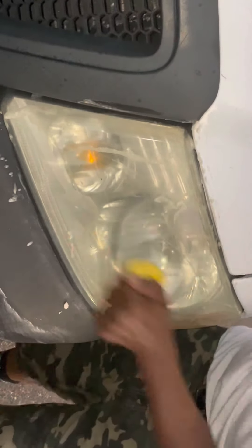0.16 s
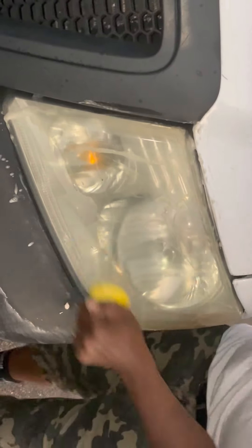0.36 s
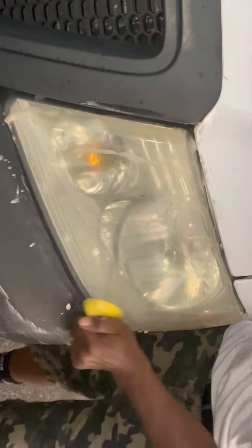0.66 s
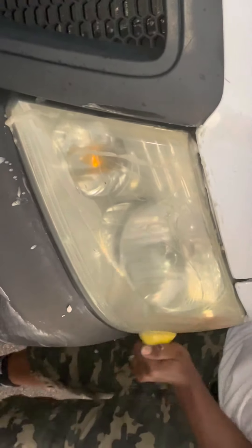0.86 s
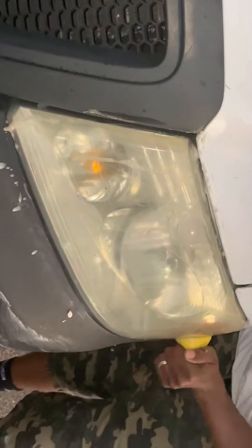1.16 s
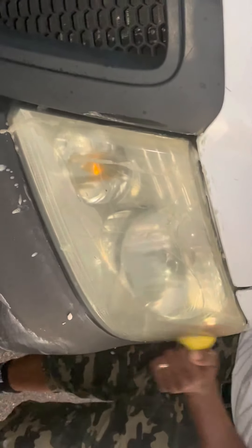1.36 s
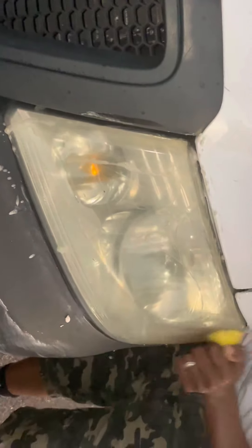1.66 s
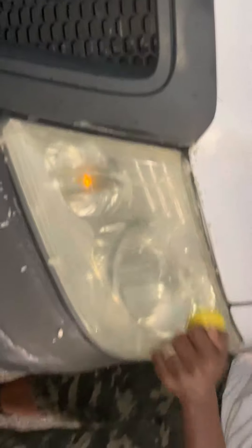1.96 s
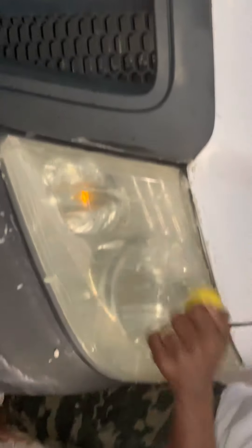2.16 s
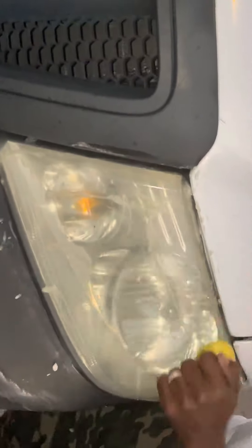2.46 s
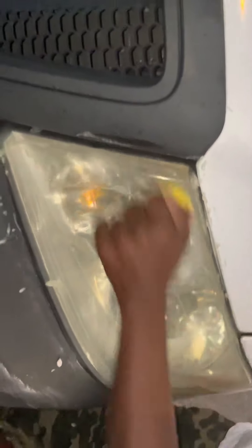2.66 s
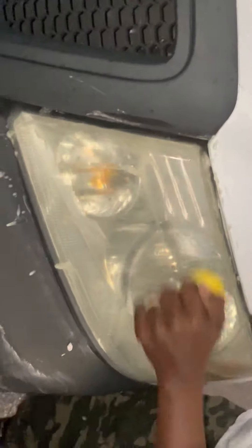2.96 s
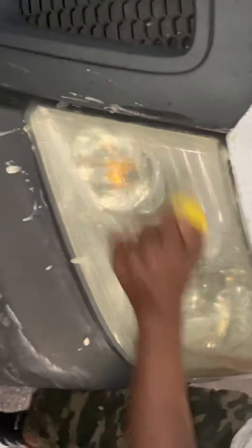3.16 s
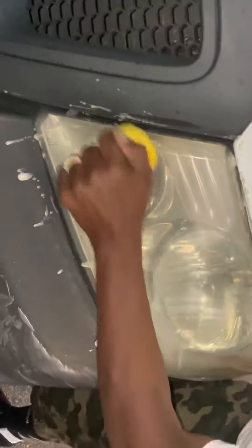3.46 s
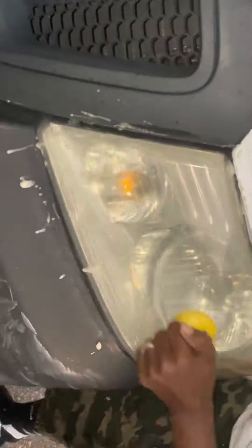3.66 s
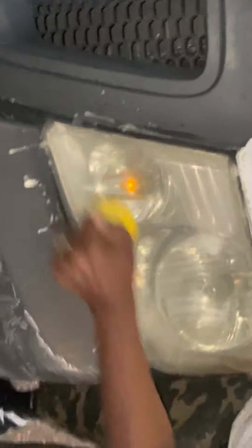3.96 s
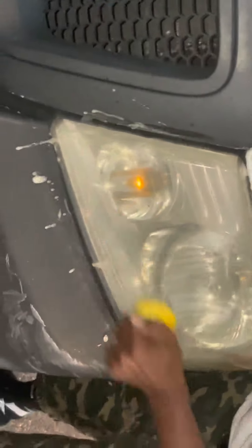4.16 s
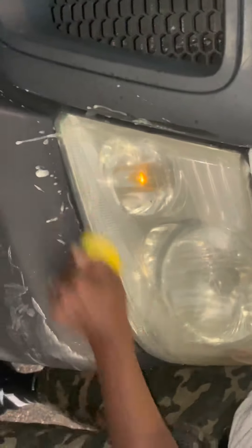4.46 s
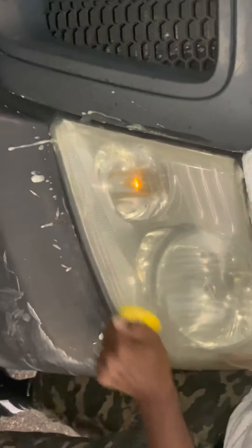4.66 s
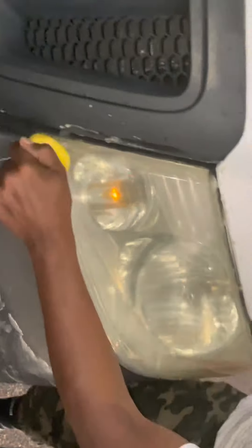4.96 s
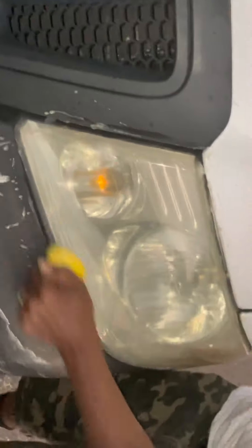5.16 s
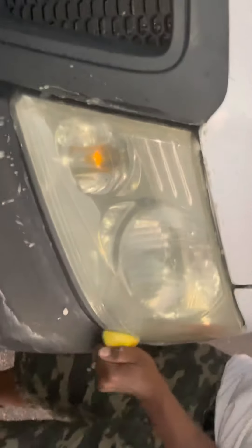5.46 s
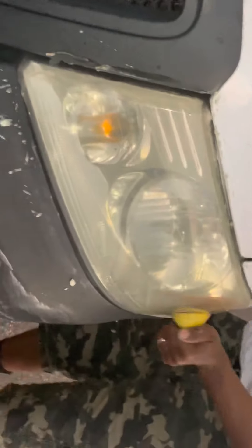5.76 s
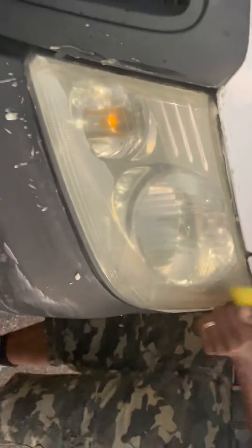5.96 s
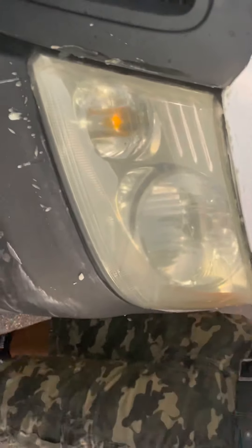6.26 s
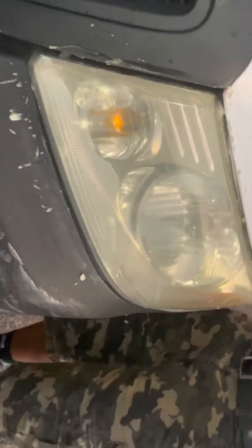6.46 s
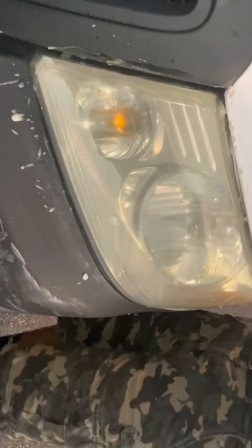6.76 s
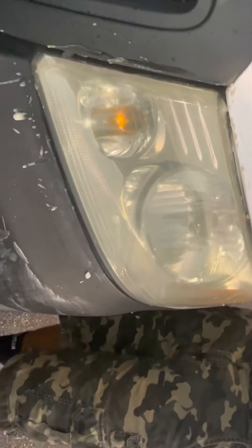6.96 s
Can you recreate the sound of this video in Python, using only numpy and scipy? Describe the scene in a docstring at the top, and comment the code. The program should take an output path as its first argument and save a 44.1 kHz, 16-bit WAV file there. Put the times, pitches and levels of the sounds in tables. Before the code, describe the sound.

Close to a phone outdoors, a cut lemon is scrubbed over a plastic headlight lens: uneven wet hisses and dry rasps dipping at each turn, with low judders, tiny clicks and hollow clucks. Distant traffic rumbles softly beneath. Past the middle, a nearby vehicle pulls away, its engine note climbing quickly and settling into a strong low hum while the scrubbing thins out.

```python
"""Outdoors by a street, a lemon half is scrubbed to and fro over a plastic headlight lens, close to a phone.
The wet pulp hisses (random impulses shaped by filters) and dips in level as the hand turns.
The rind judders, clucks and clicks on the lens: short slips that set off dying rings.
Over a low street rumble (filtered noise) a vehicle nearby picks up speed and settles into a steady hum:
sine waves that follow the engine's firing rate, with a rough drone and tyre noise."""
import sys
import numpy as np
from scipy import signal
from scipy.fft import rfft, irfft, next_fast_len
from scipy.io import wavfile
from scipy.ndimage import uniform_filter1d, map_coordinates

SR = 44100
rng = np.random.default_rng(int(sys.argv[2]) if len(sys.argv) > 2 else 0)


def dump_mix(stems):
    """Bounce the given channels to the path in sys.argv[1] as a 16-bit WAV at rate SR."""
    frames = np.atleast_2d(stems).T  # one column per channel
    limited = np.clip(frames, -1, 1)  # hard clip at full scale
    pcm = np.round(limited * 32767).astype(np.int16)
    wavfile.write(sys.argv[1], SR, pcm)


N = 313551


def amp(db):
    """Turns decibels into a gain."""
    return 10 ** (np.asarray(db) / 20)


def unit(x):
    """Scales a sound to rms 1."""
    return x / np.sqrt(np.mean(x ** 2) + 1e-20)


def along(points, hz):
    """Reads a curve of (Hz, value) points, with straight lines on a log frequency axis."""
    point_hz, value = np.transpose(points)
    return np.interp(np.log(hz + 1), np.log(point_hz + 1), value)


def curves(rows):
    """Gives one value per sample for each column after the time."""
    time_s, *columns = np.transpose(rows)
    return [np.interp(np.arange(N) / SR, time_s, column) for column in columns]


def wobble(rate):
    """A smooth random curve with this many knots a second."""
    knots = rng.standard_normal(int(N * rate / SR) + 4)
    return map_coordinates(knots, [np.arange(N) * rate / SR])


def bell(s, half):
    """A smooth hump of height 1 around time s; half sets its width in seconds."""
    return np.exp(-np.minimum(((np.arange(N) / SR - s) / half) ** 2, 20))


def filtered(x, response):
    """Multiplies the spectrum of x by a response, which may be complex."""
    m = next_fast_len(N + SR // 2)
    return irfft(rfft(x, m) * response(np.fft.rfftfreq(m, 1 / SR)), m)[..., :N]


def coloured(x, spectrum):
    """Filters x by a curve of (Hz, dB), then scales it to rms 1."""
    return unit(filtered(x, lambda hz: amp(along(spectrum, hz))))


def add(track, s, sound):
    """Mixes a sound into the track at time s."""
    part = track[max(0, round(s * SR)):][:len(sound)]
    part += sound[:len(part)]


def diffuse(spectrum):
    """Stereo noise from all round: shared and opposite parts set how alike left and right are."""
    # left-right likeness of the street: pitch_hz, likeness (0-1)
    likeness = [(100, 1), (250, 0.98), (450, 0.83), (700, 0.28), (1100, 0.55), (2200, 1)]
    a, b = (coloured(rng.standard_normal(N), spectrum) for _ in range(2))

    def angle(hz):
        return np.arccos(np.clip(along(likeness, hz), -1, 1)) / 2

    mid = filtered(a, lambda hz: np.cos(angle(hz)))
    side = filtered(b, lambda hz: np.sin(angle(hz)))
    return np.array([mid + side, mid - side])


def street():
    """Distant traffic: a low rumble under a faint wash, both wavering filtered noise."""
    # colour of the rumble: pitch_hz, relative level_db (per Hz)
    rumble_colour = [(13, -63.5), (22, -30.5), (40, -10.5), (65, 1), (164, -8), (241, -15.5), (290, -15),
                     (383, -17), (412, -15), (460, -21), (505, -17), (553, -21), (678, -21), (1800, -38),
                     (2340, -52.5), (3960, -120)]
    # colour of the wash: pitch_hz, relative level_db (per Hz)
    wash_colour = [(200, -6), (500, 11.5), (1000, 7.5), (1600, -10.5), (2300, -9), (3200, -14),
                   (4300, -27.5), (8000, -40), (16000, -49)]
    rumble = amp(-44 + 1.2 * wobble(7)) * diffuse(rumble_colour)
    wash = amp(-60.5 + 0.44 * wobble(1.4)) * diffuse(wash_colour)
    return rumble + wash


def idle():
    """The engine ticking over: a faint, unsteady throb that gives way to the rising note."""
    # the throb's tones: pitch_hz, level_db (peak, about which it wavers)
    throb_tones = [(56, -60.5), (101, -51.5)]
    t = np.arange(N) / SR
    throb = np.zeros(N)
    for hz, db in throb_tones:
        throb += amp(db + 3.1 * wobble(13)) * np.sin(2 * np.pi * hz * t + 1.6 * wobble(12))
    return throb * np.clip((4.3 - t) / 0.62, 0, 1)  # faded out by 4.3 s


def muffler(hz):
    """The exhaust weakens a line more and more steeply above an edge frequency."""
    edge_hz, slope_db_per_octave = 181.6, 147.5
    return amp(-slope_db_per_octave * np.log2(np.maximum(hz / edge_hz, 1)))


def engine():
    """The exhaust's firing note climbs and levels off; uneven firing adds lines and a rough drone."""
    # the firing note: time_s, firing_hz, level_db (rms)
    firing_path = [(4.2, 48.6, -41), (4.22, 50.3, -35), (4.37, 56.7, -41), (4.42, 59.8, -32.5),
                   (4.56, 70.59, -31), (4.68, 79.7, -28), (4.77, 86.5, -39), (4.8, 88, -34.5),
                   (4.85, 90.3, -28), (5.02, 91.96, -30.5), (5.3, 102.3, -25.5), (5.8, 108.9, -26.5),
                   (6.15, 111.1, -32.5), (6.45, 112.5, -26), (6.61, 112.9, -30), (7.11, 114.6, -26.5)]
    # weaker lines, before the muffler: multiple of the firing rate,
    # pulling_away_db, settled_db (against the smoothed firing level)
    weaker_lines = [(0.622, -23.5, -8.5), (1.251, -23.5, -25), (1.5, -24.5, -21.5), (1.625, -18, -17.5),
                    (2, -9.5, -17)]
    # colour of the exhaust roughness: pitch_hz, relative level_db (per Hz)
    drone_colour = [(22, -18), (50, -6.5), (70, 10.5), (88, 3.5), (130, 0.5), (175, 0), (215, -17.5),
                    (300, -30), (700, -54), (4000, -89.5)]
    t = np.arange(N) / SR
    hz, db = curves(firing_path)
    phase = 2 * np.pi * np.cumsum(hz * (1 + 0.0068 * wobble(18))) / SR
    running = np.clip((t - 4.18) / 0.11, 0, 1)
    settled = np.clip((t - 4.7) / 1.6, 0, 1)
    load = amp(uniform_filter1d(db, SR // 3))  # firing level smoothed over a third of a second
    firing = amp(db + 0.13 * wobble(28)) * np.sin(phase)
    lines = np.zeros(N)
    for multiple, early_db, late_db in weaker_lines:
        line_db = early_db + (late_db - early_db) * settled + 2.5 * wobble(14)
        line_phase = multiple * phase + 0.2 * wobble(6.6) + rng.uniform(0, 2 * np.pi)
        lines += muffler(multiple * hz) * amp(line_db) * np.sin(line_phase)
    drone = amp(-12.0) * coloured(rng.standard_normal(N), drone_colour)
    return running * (np.sqrt(2) * (firing + load * lines) + load * drone)


def tyres():
    """Tyre noise on the road: filtered noise that rises as the vehicle pulls away, then sinks."""
    # colour of the tyre noise: pitch_hz, relative level_db (per Hz)
    tyre_colour = [(150, -20), (245, 13), (330, 7), (500, 9), (650, -7.5), (1000, -16), (2000, -36.5),
                   (4000, -61.5)]
    # loudness of the tyre noise: time_s, level_db (rms, about which it wavers)
    rolling_level = [(4.2, -69.5), (4.9, -53.5), (5.4, -51.5), (6.4, -54), (7.1, -68)]
    level_db, = curves(rolling_level)
    return amp(level_db + 2.8 * wobble(10)) * coloured(rng.standard_normal(N), tyre_colour)


def bumps():
    """The car body gives under the hand with a dull bump: a soft, low swing that dies away."""
    # the bumps: start_s, level_db (peak), pitch_hz
    bump_list = [(3.473, -33.5, 54.7), (6.469, -32, 47.93)]
    out, t = np.zeros(N), np.arange(SR // 4) / SR
    for s, db, hz in bump_list:
        swing = np.sin(2 * np.pi * hz * t) * (1 - np.exp(-t / 0.007)) * amp(-60 * t / 0.2)
        add(out, s, amp(db) * swing / np.abs(swing).max())
    return out


def clicks():
    """Juice and rind snap against the lens: a few cycles of ring inside a broad crack."""
    # small wet clicks: start_s, level_db (of the ring, before a shared 1.5 dB boost), pitch_hz
    click_list = [(1.16, -45.5, 5330), (1.562, -42.5, 5700), (1.673, -51.5, 3950), (1.721, -44.5, 6100),
                  (2.818, -44.5, 4500), (3.104, -51.5, 5500), (3.425, -47, 2600), (3.429, -45, 2780),
                  (3.436, -44, 2010), (3.498, -46, 4060), (3.537, -42.5, 1100), (3.557, -51, 3120),
                  (3.5706, -37, 1568), (3.822, -50, 3500), (4.148, -44, 1307)]
    out, t = np.zeros(N), np.arange(SR // 40) / SR
    for s, db, hz in click_list:
        ring = np.sin(2 * np.pi * hz * t) * np.exp(-hz * t / 2.04)
        crack = 0.41 * rng.standard_normal(len(t)) * np.exp(-t / 0.0026)
        add(out, s, amp(db + 1.5) * (ring + crack))
    return out


def stick_slip(events, modes, attack, jitter, fade_db):
    """Each catch is a short, uneven train of slips that ring the plastic's damped modes."""
    out, t = np.zeros(N), np.arange(SR // 10) / SR
    for s, first_db, later_db, rate, length, pitch in events:
        for k in range(1 + int(length * rate)):
            ring = np.zeros(len(t))
            for hz, width, db in modes:
                strength = amp(db + rng.normal(0, 2.1))
                mode_hz = hz * pitch * rng.normal(1, 0.019)
                tone = np.sin(2 * np.pi * mode_hz * t + rng.uniform(0, 2 * np.pi))
                ring += strength * np.exp(-np.pi * width * t) * tone  # a wider mode dies faster
            ring *= 1 - np.exp(-(t / attack) ** 2)  # the soft rind lets go gradually
            late = (k + jitter * rng.normal() * (k > 0)) / rate  # seconds after the first slip
            slip_db = later_db - fade_db * late / length if k else first_db
            add(out, s + late, amp(slip_db) * ring / np.abs(ring).max())
    return out


def bodywork(x, t60, wet_db):
    """Panels and ground scatter a faint tail, different at each microphone."""
    t = np.arange(SR // 3) / SR
    envelope = amp(-60 * t / t60) * (1 - np.exp(-t / .004))
    tail = rng.standard_normal((2, len(t))) * envelope
    wet = signal.fftconvolve(x[None], tail / np.linalg.norm(tail[0]), axes=1)[:, :N]
    return x + amp(wet_db) * wet


def judders():
    """The rind sticks and slips, shaking the headlight housing, whose modes ring."""
    # the judders: start_s, first_slip_db (peak), later_slips_db (peak, before a slight rise along
    # the train), slips per second, length_s, pitch factor
    judder_list = [(.685, -38.5, -41.5, 145, 0.014, 1.45), (.815, -20.5, -25.5, 138, .044, 1.015),
                   (1.122, -24.5, -30.5, 136, 0.039, 1.04), (3.5385, -33, -53, 100, 0.015, 1.09),
                   (3.758, -38, -55, 95, .012, 1.13), (4.461, -28, -34, 101.6, .012, 1.215),
                   (6.07, -29, -26, 65, .02, 0.793), (6.465, -38, -37.5, 99, 0.019, 1.47)]
    # modes of the housing: pitch_hz (before the pitch factor), width_hz, relative level_db
    housing_modes = [(127, 110, 4.5), (230.8, 33.4, 2), (300, 30.6, 0.5), (390, 90, -7.5), (491, 45, -8.5),
                     (671, 90, -9.5), (803, 67, -13)]
    slips = stick_slip(judder_list, housing_modes, attack=0.0025, jitter=0.188, fade_db=-1.0)
    return bodywork(slips, t60=0.45, wet_db=-22.0)


def clucks():
    """The rind catches and clucks on the lens, whose modes ring, a little louder on the right."""
    # the clucks, before the left-right balance: start_s, first_slip_db (peak),
    # later_slips_db (peak, before a fade along the train), slips per second, length_s, pitch factor
    cluck_list = [(3.8545, -26, -51, 81, 0.017, 1), (4.113, -42, -42.5, 186, 0.023, 0.98),
                  (4.2435, -37, -53, 100, 0.02, 0.94), (4.3435, -37, -38, 150, .018, 0.995),
                  (4.391, -39.5, -45, 190, 0.011, 1.06), (5.5403, -28, -36.5, 143, 0.037, 0.97)]
    # modes of the lens: pitch_hz (before the pitch factor), width_hz, relative level_db
    lens_modes = [(440, 150, -4.5), (597, 97, -5), (799, 78, 2), (943, 93, -2)]
    slips = stick_slip(cluck_list, lens_modes, attack=0.0018, jitter=0.29, fade_db=2.5)
    return bodywork(slips, t60=0.45, wet_db=-9.5) * amp([[-.6], [.6]])


def hand():
    """Level and dryness in dB: each stroke swells or fades evenly, and the sliding slows at turns."""
    # one row per stroke, lasting until the next; a drier patch rasps more and fizzes less:
    # start_s, turn_dip_db, level_db (mid-stroke, before the layers' gains), swell_db, dryness_db
    stroke_list = [(-.05, 0, -62.5, -17.5, 1.5), (.19, -0.5, -62, 7.5, 2), (.269, -12.5, -59, -2.5, 3),
                   (0.52, -19, -58.5, -12, 2), (.67, -2.5, -62, -3, 4), (1.008, -14, -65, -9.5, 2.5),
                   (1.13, -2, -71, -2.5, 3), (1.427, -8, -71.5, 3, 2), (1.7, -10, -64.5, 5.5, 0),
                   (1.898, -20, -69.5, -8.5, 2), (2.058, -5, -67.5, 2, 1), (2.3, -9, -69, 0, 1.5),
                   (2.502, -8.5, -68, 3, 1.5), (2.726, -12, -67, -0.5, 2.5), (2.905, -4.5, -68, 4, 3),
                   (3.09, -7.5, -67, -1.5, 1), (3.294, -8.5, -65.5, 3.5, 0.5), (3.493, -6, -64, -3, 1.5),
                   (3.69, -4.5, -65, 4.5, 0), (3.903, -7.5, -60.5, -0.5, 2.5),
                   (4.126, -18.5, -58.5, -1.5, 1.5), (4.361, -7, -59, -5, 3.5),
                   (4.616, -12.5, -58.5, -8, 3), (4.97, -16.5, -59, 0.5, 3), (5.36, -4.5, -64, -13.5, 4),
                   (5.71, -2, -76.5, 1, -0.5), (6, -11.5, -68, -4.5, 4.5), (6.27, -4, -74.5, -8, 2.5),
                   (6.62, -2.5, -77, -5, 1), (6.86, -0.5, -75.5, 8, 4.5)]
    turn_s, blend_s = 0.012, .02  # half length of a turn; time for one stroke to give way to the next
    t = np.arange(N) / SR
    start, dip_db, db, swell_db, dry_db = np.transpose(stroke_list)
    stroke = np.maximum(np.searchsorted(start, t, side="right") - 1, 0)
    progress = (t - start[stroke]) / np.diff(start, append=N / SR)[stroke]
    stroke_db = db[stroke] + swell_db[stroke] * (progress - .5)
    level_db, dryness_db = uniform_filter1d([stroke_db, dry_db[stroke]], int(blend_s * SR))
    turning_db = sum(dip * bell(s, turn_s) for s, dip in zip(start, dip_db))
    return level_db + turning_db, dryness_db


def pushes():
    """The hand leans in or eases off: a swell or lull in dB for rasp, hiss and fizz."""
    # changes of pressure: middle_s, half_length_s, rasp_gain_db, hiss_gain_db, fizz_gain_db
    push_list = [(0.243, 0.018, 5, 5, 2.5), (.765, 0.055, 7.5, 14.5, 4), (2.267, 0.025, 9.5, 9.5, 11),
                 (2.673, 0.028, 9, 10, 15.5), (4.039, 0.034, 0.5, 7, 8.5), (4.483, 0.029, 10, 13, 11.5),
                 (4.969, .04, -10, -11, -11), (5.12, .035, 7.5, 7, 1.5), (5.216, 0.066, 6.5, 4, -1.5),
                 (6.01, 0.051, -15, -17, -15.5), (6.372, 0.045, 2.5, 8, 4), (6.691, 0.034, 1.5, 6, 4)]
    return sum(np.outer(gains_db, bell(s, half)) for s, half, *gains_db in push_list)


def grains(rate, spread_db):
    """Tiny slips and bursting films of juice: random impulses of uneven size."""
    hits = rng.random(N) < rate / SR
    return hits * rng.standard_normal(N) * amp(spread_db * rng.standard_normal(N))


def roaming(x, depth_db):
    """The lens rings differently under each spot of contact, so narrow resonances come and go."""
    z = signal.stft(x, nperseg=1024)[2]
    field = rng.standard_normal(z.shape)
    for _ in range(2):  # smooth the random gains over frequency, then time
        field = uniform_filter1d(uniform_filter1d(field, size=3, axis=0), size=5, axis=1)
    return unit(signal.istft(z * amp(depth_db * unit(field)), nperseg=1024)[1][:N])


def scrubbing():
    """Dense micro-slips sound while the lemon slides and sink where the hand turns round."""
    # colours of the layers, from dull to bright: pitch_hz, relative level_db (per Hz)
    murmur_colour = [(120, -18.5), (245, 12.5), (310, -3.5), (400, -2), (500, -1.5), (620, -14), (800, -1),
                     (980, -9), (1120, -0.5), (1350, -6.5), (1700, -7.5), (2500, -27)]  # the housing murmurs under the rubbing
    rasp_colour = [(500, -17), (950, -2.5), (1350, 4.5), (1700, 1), (2150, 0.5), (2400, -1.5), (2600, 0),
                   (2850, 0.5), (3300, -2.5), (4000, -7.5), (5000, -14.5), (8000, -49.5)]
    bite_colour = [(2300, -14), (2650, -9), (2830, -5), (3250, -4.5), (3700, -6.5), (4500, -26)]  # the lens shrills under hard strokes
    hiss_colour = [(2500, -27), (3800, -3.5), (4400, -3), (4950, -2.5), (5400, 0), (6200, -1.5), (7300, -1),
                   (8500, -5), (12000, -12.5)]
    fizz_colour = [(4000, -28.5), (7000, -9), (8700, 2.5), (12300, 3), (13600, 1.5), (16000, -3)]
    # the housing's murmur over time: time_s, gain_db (added to its level from the strokes)
    murmur_gain = [(0, 7.5), (.8, 4), (1.5, 2), (2.9, -9), (3.5, 3), (4.5, -1.5), (5.5, -1.5), (7.1, -5.5)]
    light_db, hard_db = -63.5, -45.5  # rasp levels of a light and a hard stroke, before layer gains
    level_db, dry_db = hand()
    # each dB of dryness adds one dB of rasp and takes one dB of fizz
    rasp_db, hiss_db, fizz_db = pushes() + [level_db + dry_db, level_db, level_db - dry_db]
    grip_db = 0.98 * wobble(45)
    murmur_db, = curves(murmur_gain)
    housing_db = light_db + 0.75 * (level_db + dry_db - light_db)  # grows more slowly than the rasp
    extra_db = 0.95 * (rasp_db - hard_db)  # the shrill ring grows faster than the rasp

    murmur = coloured(grains(rate=2300, spread_db=1.5), murmur_colour)
    rasp = coloured(roaming(grains(rate=5000, spread_db=1.0), depth_db=3.0), rasp_colour)
    bite = coloured(roaming(grains(rate=2900, spread_db=3.5), depth_db=3.5), bite_colour)
    hiss = coloured(roaming(grains(rate=14000, spread_db=-0.5), depth_db=2.5), hiss_colour)
    fizz = coloured(roaming(grains(rate=22000, spread_db=2.5), depth_db=3.5), fizz_colour)

    layers = amp(housing_db + murmur_db) * murmur
    layers += amp(rasp_db - 1) * rasp
    layers += amp(rasp_db + extra_db + 1.5) * bite
    layers += amp(hiss_db - 0.5) * hiss
    layers += amp(fizz_db + 6) * fizz
    return amp(grip_db) * layers


def two_microphones(x):
    """The sound reaches two microphones out of step in the treble: half the phase goes to each."""
    # phase between the microphones: pitch_hz, phase (radians)
    phase_gap = [(2300, 0), (3200, .22), (4200, .4), (4850, 1.3), (5300, .05), (6000, .25), (6500, 1.1),
                 (8000, 1.9), (9200, 3.05), (10800, 3.2), (12000, 4.2), (13000, 4.8), (14500, 6.1)]
    halves = np.array([[.5j], [-.5j]])
    return filtered(x, lambda hz: np.exp(halves * along(phase_gap, hz)))


def scene():
    """Mixes the wide street, the central vehicle and bumps, and the sounds of lemon on lens."""
    vehicle = idle() + engine() + tyres()
    near = two_microphones(scrubbing() + clicks())
    return street() + vehicle + bumps() + judders() + clucks() + near


def record(dry):
    """The phone keeps nothing above its band limit."""
    top_hz = 15830
    return filtered(dry, lambda hz: hz < top_hz)


dry = scene()
out = record(dry)
dump_mix(out)
```